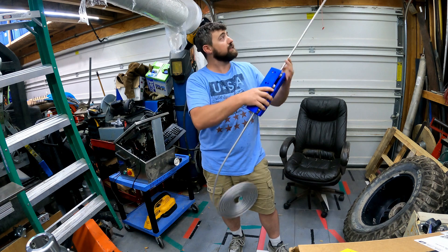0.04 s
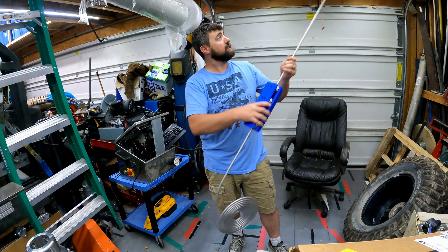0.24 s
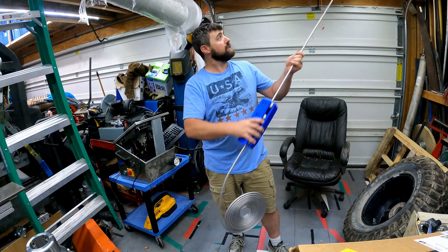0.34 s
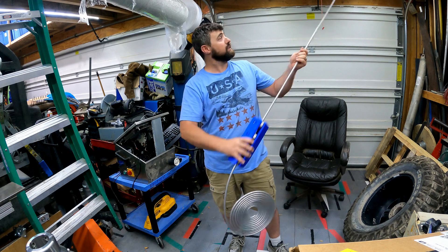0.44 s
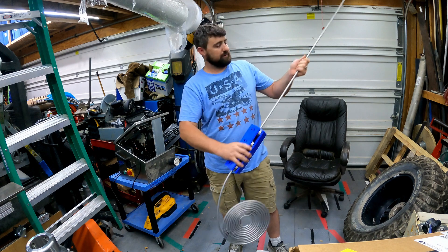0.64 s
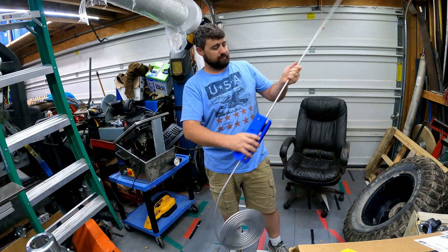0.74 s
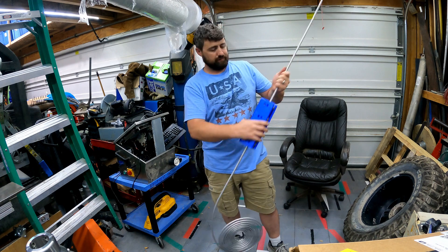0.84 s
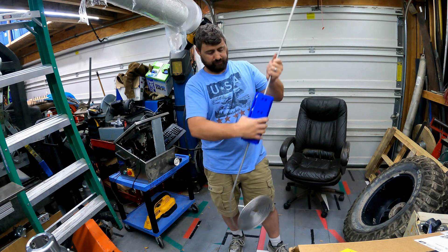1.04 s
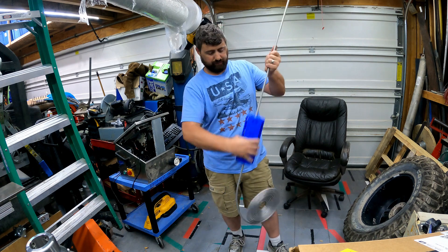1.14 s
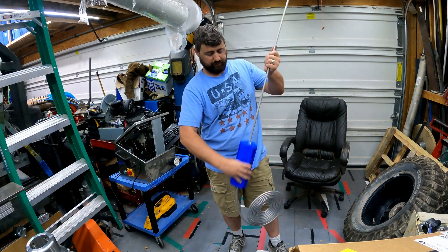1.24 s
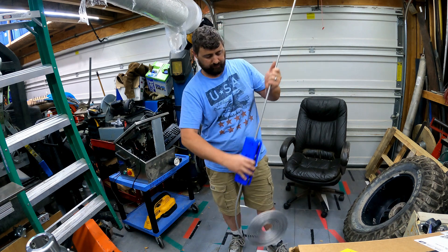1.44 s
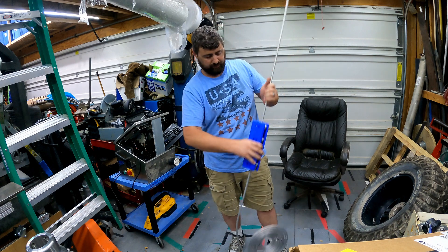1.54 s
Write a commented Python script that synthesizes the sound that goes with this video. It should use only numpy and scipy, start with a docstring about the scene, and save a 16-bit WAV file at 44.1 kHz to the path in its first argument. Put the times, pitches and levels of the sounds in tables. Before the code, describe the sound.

Scraping of aluminum tubing over rollers swells and dips while loose coil turns clink and jangle, louder after one second, with one low hollow thud; slight garage echo, faint low hum, close microphone pair.

```python
"""An aluminium tube is pulled through a hand-held roller tool in a garage: it rubs on the rollers in thousands
of tiny slips, which sound through the tool and ring the tube. The loose coil hanging below clashes turn against
turn: each clash adds fading tones and dense dying noise, and now and then one tone rings out alone. Once
something hollow is knocked: a click, a crack, a low thud with echoes and a boom. Low noise is the garage hum."""
import sys
import numpy as np
from scipy import signal
from scipy.fft import rfft, irfft
from scipy.io import wavfile
from scipy.ndimage import uniform_filter1d

SR = 44100
rng = np.random.default_rng(int(sys.argv[2]) if len(sys.argv) > 2 else 0)


def attenuation_scalar(level_db):
    """Turn a level in dB into a linear amplitude multiplier (20 dB per decade)."""
    decades = np.asarray(level_db, float) / 20
    return 10 ** decades


def dump(signal):
    """Clip the signal to [-1, 1] and save it as 16-bit WAV at the path in sys.argv[1]."""
    limited = np.clip(np.atleast_2d(signal).T, -1, 1)
    pcm = np.round(limited * 32767).astype(np.int16)
    wavfile.write(sys.argv[1], SR, pcm)


N = 70560  # samples, 1.6 s

# strong tones (modes) of the aluminium tube and its coil: f/Hz, relative level/dB, time to fade by 60 dB/s
COIL = [(1125, -19.5, 0.35), (1664.4, -7.5, 0.19), (2186, -6, 0.15), (2802, -11.5, 0.4), (3342, -6, 0.12),
        (3600, -7, 0.12), (4080, -6.5, 0.16), (4670, -10, 0.26), (4888, -4.5, 0.19), (5140, -4, 0.11),
        (5510, -18.5, 0.13), (6480, -7.5, 0.17), (7345, -4.5, 0.18), (7780, -9, 0.14), (9780, -11, .084)]


def evened(x):
    """Scales a sound to an average (rms) level of 1."""
    return x / np.sqrt(np.mean(x ** 2) + 1e-20)


def read(points, hz):
    """Reads a curve between its points, along a logarithmic frequency scale."""
    f, value = np.transpose(points)
    return np.interp(np.log(hz + 1), np.log(f + 1), value)


def add(mix, s, sound):
    """Adds a sound to the mix from s seconds on, cut off at the end of the mix."""
    part = mix[round(s * SR):][:len(sound)]
    part += sound[:len(part)]


def coloured(x, points):
    """Makes each frequency louder or softer by a curve in dB."""
    n = x.shape[-1]
    return irfft(rfft(x) * attenuation_scalar(read(points, np.fft.rfftfreq(n, 1 / SR))), n)


def resonate(x, hz, width):
    """A fixed resonance of gain 1 at its peak; a wider one (Hz) dies faster."""
    return signal.lfilter(*signal.iirpeak(hz, hz / width, SR), x)


def ticks(n, per_s, spread_db):
    """A random train of tiny impacts, a few of them large."""
    hit, size, sign = rng.random((3, n))
    strength_db = spread_db * np.minimum(-np.log(size + 1e-9), 5)
    return (hit < per_s / SR) * attenuation_scalar(strength_db) * np.sign(sign - .5)


def decaying(t60_points, seconds):
    """Noise whose frequency bands each die at their own speed, total energy 1."""
    noise = rng.standard_normal(round(seconds * SR))
    hz, t, bands = signal.stft(noise, SR, nperseg=128)
    fading = bands * attenuation_scalar(-60 * t / read(t60_points, hz)[:, None])
    tail = signal.istft(fading, SR, nperseg=128)[1]
    return tail / np.linalg.norm(tail)


def burst(t60_points, points, seconds):
    """Coloured dying noise that starts near rms level 1 and is faded to silence over its last quarter."""
    x = coloured(decaying(t60_points, seconds), points)
    fade = np.clip(4 - 4 * np.arange(len(x)) / len(x), 0, 1) ** 2
    return x / np.sqrt(np.mean(x[:600] ** 2)) * fade


def coupling(k, place):
    """How strongly mode k answers at a place along the tube: not at all where the mode stands still."""
    return np.sin(np.pi * (k + 1) * place) ** 2


def hum():
    """Garage hum: steady random noise, shaped to be mostly low."""
    # spectrum of the hum: f/Hz, relative level/dB
    hum_colour = [(12, -46), (20, -8), (53, 0.5), (97, -17), (146, 1), (232, 3), (310, -9.5), (452, -15),
                  (518, -14), (823, -26), (1200, -19), (1560, -53)]
    return attenuation_scalar(-62.5) * evened(coloured(rng.standard_normal(N), hum_colour))


def thud(t):
    """The hollow panel sounds low tones that each fade at their own speed."""
    # tones (modes) of the panel: f/Hz, relative level/dB, time to fade by 60 dB/s
    panel_modes = [(76.4, -24, 0.84), (132.7, -12, 0.53), (170, -8, 0.2), (182.6, 0, 0.13),
                   (192.2, -9, 0.51), (261.2, 5, 0.07), (280, -9, 0.2), (344.7, -10.5, 0.092),
                   (417, -13, 0.081), (766, -5.5, 0.028)]
    rise_s = 0.0048
    tones = sum(attenuation_scalar(g - 60 * t / t60) * np.sin(2 * np.pi * hz * t) for hz, g, t60 in panel_modes)
    return -tones * np.minimum(t / rise_s, 1)


def boom(t):
    """The blurred answer of the room to the blow: low noise that swells briefly and fades."""
    # spectrum of the boom: f/Hz, relative level/dB
    boom_colour = [(35, -27), (70, 3), (130, 1), (190, -3), (270, -11), (350, -28), (650, -10.5),
                   (1000, -13.5), (1500, -51)]
    level_db, t60_s, rise_s = -15.5, 0.6, 0.028
    noise = evened(coloured(rng.standard_normal(len(t)), boom_colour))
    return attenuation_scalar(level_db - 60 * t / t60_s) * noise * np.minimum(t / rise_s, 1)


def knock():
    """One blow on a hollow panel: a click, a hard crack, low modes thrown back by the walls, and a boom."""
    # returns of the thud from the walls, counted from lag_s after the blow: delay t/s, level/dB
    echoes = [(.031, -7), (.050, -9), (.072, -9.5), (.105, -21.5)]
    # spectrum of the crack: f/Hz, relative level/dB
    crack_colour = [(250, -13), (450, 2), (800, -5), (1500, -2), (2300, 3.5), (3100, 6), (3800, -6),
                    (9000, -20), (14000, -55)]
    # how fast the crack dies: f/Hz, time to fade by 60 dB/s
    crack_t60 = [(400, 0.2), (1000, 0.23), (2000, 0.11), (4000, 0.048)]
    knock_s, knock_db, lag_s = 1.1632, -11.5, 0.00291
    crack_db, click_db, click_s = -9.5, -5.5, .0006  # levels before knock_db
    t, out = np.arange(0, .6, 1 / SR), np.zeros(N)
    panel = thud(t)
    for delay, db in [(0.0015, 0)] + echoes:  # the thud itself, then its echoes
        add(out, knock_s + lag_s + delay, attenuation_scalar(db) * panel)
    add(out, knock_s, attenuation_scalar(crack_db) * burst(crack_t60, crack_colour, .3))
    click = np.exp(-t / click_s) * rng.standard_normal(len(t))  # first contact of the blow
    add(out, knock_s, attenuation_scalar(click_db) * click)
    add(out, knock_s, boom(t))
    return attenuation_scalar(knock_db) * out


def sing(start, hz, db):
    """A free turn rings on one mode, its pitch shivering as the turn shakes, dying at its own speed."""
    rise_s, shiver_hz = 0.0053, 34.7  # rms pitch shiver
    t = np.arange(0, .4, 1 / SR)
    t60 = read([(f, t60) for f, g, t60 in COIL], hz)
    wander = evened(uniform_filter1d(rng.standard_normal(len(t)), size=200))
    shiver = shiver_hz * np.cumsum(wander) / SR  # in cycles
    envelope = attenuation_scalar(db - 60 * t / t60) * (1 - np.exp(-t / rise_s))
    return start, envelope * np.sin(2 * np.pi * (hz * t + shiver))


def clash(start, db, tilt_db, rattle_s, place):
    """Turns meet and rattle: strong modes and dense shimmer build up over the rattle and die away."""
    # the coil's many small modes, heard as noise: f/Hz, relative level/dB
    shimmer_colour = [(290, -53), (500, -22), (1000, -20), (1660, -8), (2560, -6), (4440, -3.5), (4770, -4),
                      (11400, -8), (13900, -18.5), (15800, -29)]
    # how fast they die: f/Hz, time to fade by 60 dB/s
    shimmer_t60 = [(1000, 0.48), (3000, 0.37), (6000, 0.25), (10000, 0.13), (15000, 0.09)]
    modes_db, shimmer_db = -12, -11
    swing = .003  # the swinging coil detunes each mode by up to about this share
    t = np.arange(0, .4, 1 / SR)
    detune, phase = rng.uniform(-1.04, 1, (2, len(COIL)))
    ring = np.zeros(len(t))
    for k, (hz, g, t60) in enumerate(COIL):
        level_db = g + tilt_db * np.log2(hz / 4000) - 60 * t / t60
        tone = np.sin(2 * np.pi * hz * (1 + swing * detune[k]) * t + np.pi * phase[k])
        ring += attenuation_scalar(level_db) * coupling(k, place) * tone
    colour = [(hz, g + tilt_db * np.log2(hz / 4000)) for hz, g in shimmer_colour]
    shimmer = burst(shimmer_t60, colour, .4)[:len(t)]
    build_up = np.sqrt(1 - np.exp(-t / rattle_s))
    return start, attenuation_scalar(db) * build_up * (attenuation_scalar(modes_db) * ring + attenuation_scalar(shimmer_db) * shimmer)


def hanging_coil():
    """All clashes and ringing turns of the loose coil, kept above about 500 Hz."""
    # turns clash: t/s, strength level/dB, brightness/dB per octave, rattle/s, place along the coil (0-1)
    clashes = [(0.024, -28.5, -2.5, 0.00037, 0.38), (0.046, -31, -3, 0.0026, 0.04),
               (0.1158, -23, -2.5, 0.00074, 0.38), (0.191, -17, 1.5, 0.001, 0.28),
               (0.2672, -29.5, 3, 0.0019, 0.5), (0.3026, -23, -2.5, 0.013, 0.3),
               (0.4382, -13.5, 0, 0.0086, 0.23), (0.4913, -15, 0.5, 0.0042, 0.36),
               (0.6064, -19, 1, 0.0047, .48), (0.6354, -19, 1.5, 0.0068, 0.12),
               (0.6603, -14, 3.5, 0.003, 0.43), (0.6796, -22, 0.5, 0.0013, .06),
               (0.7565, -20, -2.5, 0.0075, 0.07), (0.8669, -20, -2, 0.0022, 0.15),
               (0.878, -18.5, 0, 0.0034, 0.05), (1.034, -9.5, 1, .0006, .33),
               (1.1713, -12.5, 2, 0.0029, 0.14), (1.21, -16, -1.5, 0.005, 0.03),
               (1.2423, -7.5, 2, 0.015, 0.33), (1.289, -15.5, 3, 0.0022, 0),
               (1.4614, -26.5, -3, 0.0002, .21), (1.589, -23, -2.5, .003, .48)]
    # a free turn rings out on one mode: t/s, f/Hz, strength level/dB
    sings = [(.1916, 3600, -23), (.1918, 5160, -25.5), (.192, 7345, -26.5), (.497, 1125, -34.5),
             (.945, 1652, -31), (1.0342, 2186, -27), (1.0344, 3354, -24), (1.0351, 4140, -23),
             (1.236, 4888, -22), (1.272, 4888, -22.5)]
    coil = np.zeros(N)
    for row in clashes:
        add(coil, *clash(*row))
    for row in sings:
        add(coil, *sing(*row))
    return signal.lfilter(*signal.butter(2, 500, "high", fs=SR), coil)


def rub():
    """Dense slips of tube on roller sound through the tool body and ring the tube where the rollers touch it."""
    # the pull: t/s, rub level/dB, ring of the tube against the rub level/dB
    pull = [(0, -55.5, -9), (.05, -47.5, 0), (.1, -45, -11), (.19, -55, 11), (.3, -37, -22),
            (.4, -34.5, -21), (.5, -31.5, -30), (.58, -42.5, 3), (.7, -35.5, -24), (.82, -37, -11.5),
            (.93, -35, 1), (1.0, -42, -2), (1.031, -44, -21), (1.131, -34, -8.5), (1.249, -36.5, 2),
            (1.33, -35, -11), (1.408, -57.5, -5), (1.455, -44, -22), (1.481, -36.5, -19), (1.6, -34.5, -13)]
    # how the tool body colours the slips: f/Hz, relative level/dB
    tool_colour = [(180, -52), (300, -21.5), (775, -14.5), (1020, -7.5), (1230, -6), (1670, 0), (2360, -7),
                   (3120, 1), (3550, -5.5), (7540, -13), (11900, -24.5), (15000, -40)]
    patchy_db = 3.5  # rms unevenness over time and frequency
    damping = 8  # the touching rollers make the tube's modes die this many times faster
    s, db, ring_db = np.transpose(pull)
    t = np.arange(N) / SR
    slips = evened(ticks(N, per_s=7000, spread_db=3.2))
    bands = signal.stft(evened(coloured(slips, tool_colour)), nperseg=512)[2]
    patches = uniform_filter1d(rng.standard_normal(bands.shape), 3, 0)  # smooth across frequency
    patches = evened(uniform_filter1d(patches, 6, 1))  # then across time
    body = evened(signal.istft(bands * attenuation_scalar(patchy_db * patches), nperseg=512)[1][:N])
    place = 0.625 + 0.399 * t  # rollers travel along the tube; past 1 the coupling pattern repeats
    rings = np.zeros(N)
    for k, (hz, g, t60) in enumerate(COIL):
        width_hz = damping * np.log(1000) / np.pi / t60
        tone = evened(resonate(slips, hz, width_hz))
        rings += attenuation_scalar(g + read(tool_colour, hz) / 2) * coupling(k, place) * tone
    ring_level = attenuation_scalar(np.interp(t, s, ring_db))
    return attenuation_scalar(np.interp(t, s, db)) * (body + ring_level * evened(rings))


def garage(x, wet_db):
    """Direct sound plus the tail of the room, whose pitches die at different speeds."""
    # room tail: f/Hz, time to fade by 60 dB/s
    room_t60 = [(150, 0.5), (1000, 0.49), (4000, 0.14), (12000, 0.22)]
    tail = np.pad(decaying(room_t60, .6), (300, 0))  # starts 300 samples late
    return x + attenuation_scalar(wet_db) * signal.fftconvolve(x, tail)[:N]


def ports(x):
    """Two close microphone ports: mostly the same sound, partly scattered with wandering phase."""
    # likeness of the two ports: f/Hz, correlation (0-1)
    likeness = [(30, .97), (60, .99), (130, .995), (250, .985), (550, .82), (1200, .84), (2500, .8),
                (4970, .83), (9000, .88), (11000, .75), (14000, .45)]
    # first port against second: f/Hz, level/dB
    level_gap = [(30, -2), (70, -1), (250, -.5), (550, -.3), (1200, -1.9), (2500, -1.7), (4970, -.2),
                 (9000, 1.3), (14000, .6)]
    # first port ahead of second: f/Hz, phase/rad
    phase_gap = [(900, 0), (1900, -.3), (3200, -.5), (4200, -.35), (7300, 0), (11500, 0), (13000, .2)]
    hz = np.fft.rfftfreq(N, 1 / SR)
    same = np.clip(read(likeness, hz), 0, 1)
    loose = irfft(np.sqrt((1 - same) / 2) * rfft(x), N)
    bands = signal.stft(loose, nperseg=512)[2]
    turn = uniform_filter1d(rng.standard_normal((2,) + bands.shape), size=2, axis=2)
    turned = bands * np.exp(1j * np.arctan2(*turn))
    scatter = evened(signal.istft(turned, nperseg=512)[1][:N]) * np.std(loose)
    half = attenuation_scalar(read(level_gap, hz) / 2) * np.exp(.5j * read(phase_gap, hz))  # half the gap for each port
    mid, side = np.sqrt((1 + same) / 2) * rfft(x), rfft(scatter)
    return irfft(np.array([(mid + side) * half, (mid - side) / half]), N)


def scene():
    """Coil, rub and knock in the garage, with its hum, as they reach the two ports."""
    tube = garage(hanging_coil() + rub(), wet_db=-10)
    blow = garage(knock(), wet_db=-14.5)
    return ports(tube + blow + hum())


def roll_off(x):
    """The treble ends steeply here."""
    return signal.sosfilt(signal.butter(12, 15990, fs=SR, output="sos"), x)


def record(dry):
    """The microphone softens the highest treble."""
    # microphone response: f/Hz, level/dB
    mic_response = [(70, 0), (14000, 0.24), (15300, -7), (16000, -18)]
    return roll_off(coloured(dry, mic_response))


dry = scene()
out = record(dry)
dump(out)
```